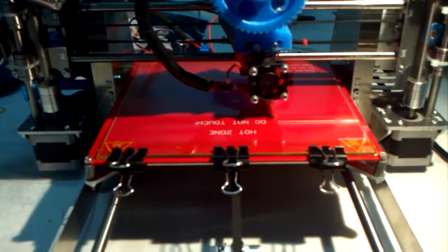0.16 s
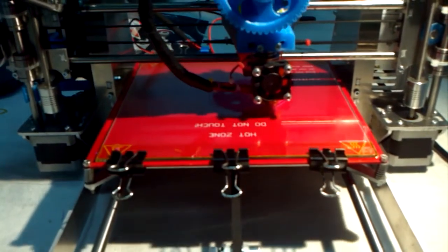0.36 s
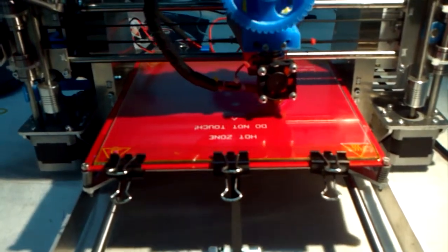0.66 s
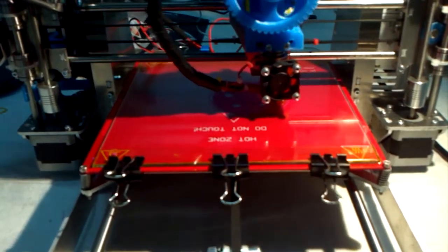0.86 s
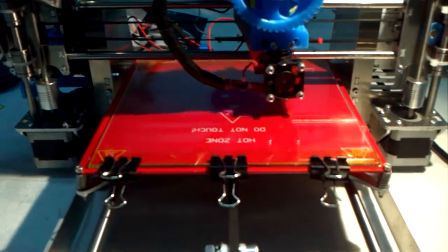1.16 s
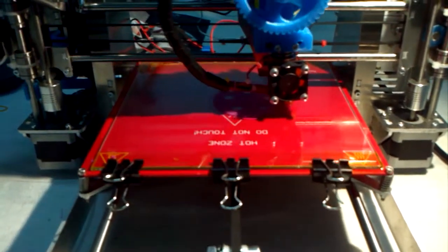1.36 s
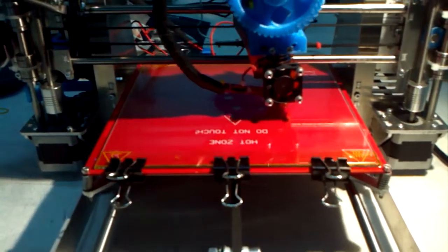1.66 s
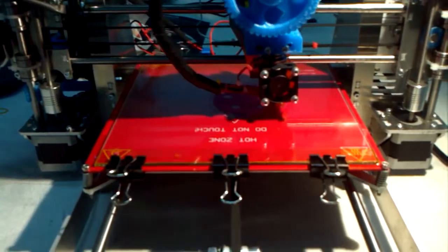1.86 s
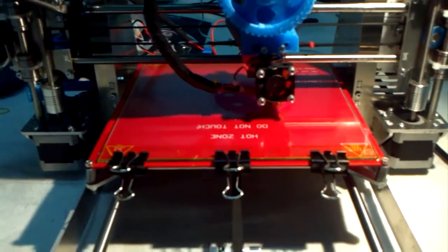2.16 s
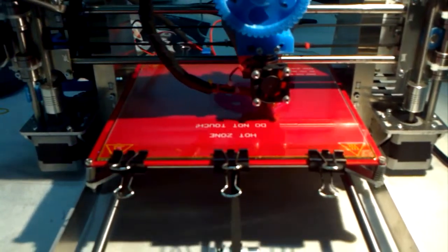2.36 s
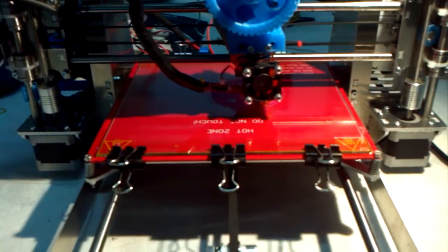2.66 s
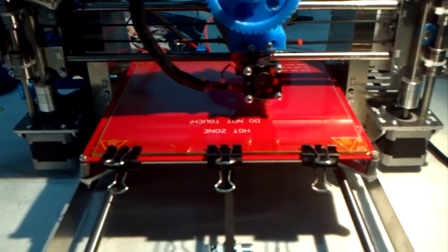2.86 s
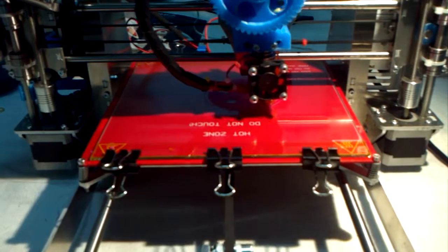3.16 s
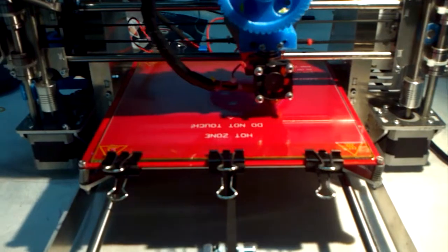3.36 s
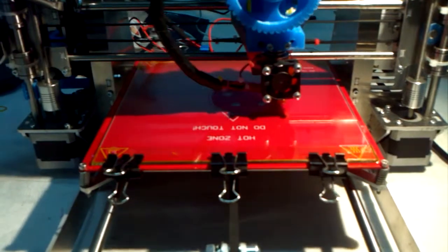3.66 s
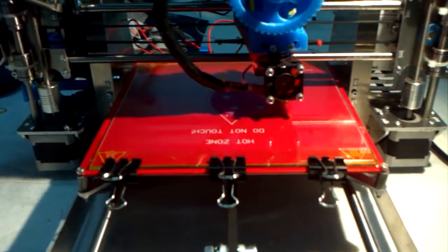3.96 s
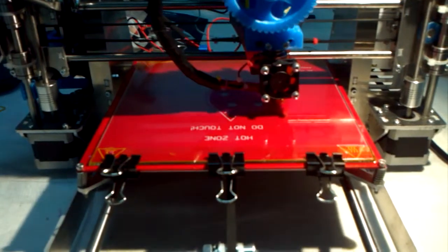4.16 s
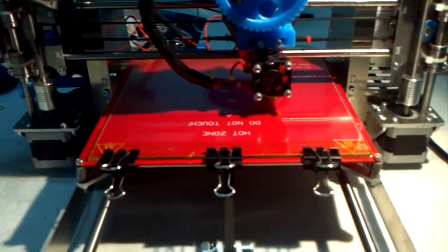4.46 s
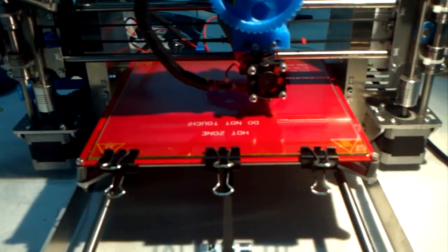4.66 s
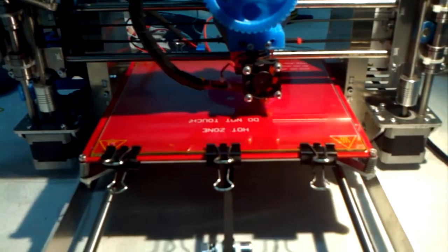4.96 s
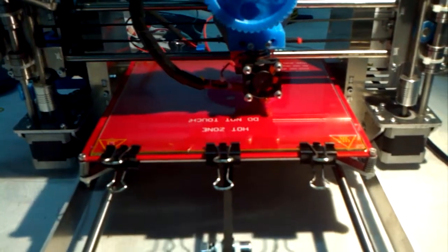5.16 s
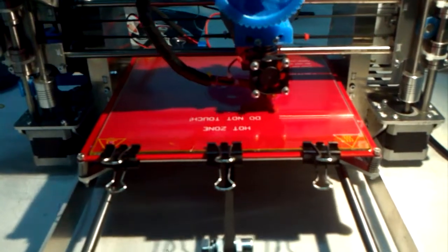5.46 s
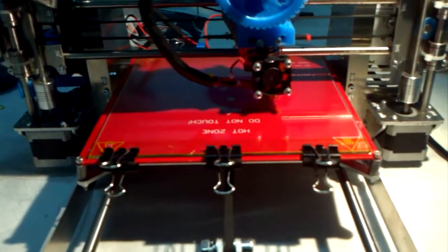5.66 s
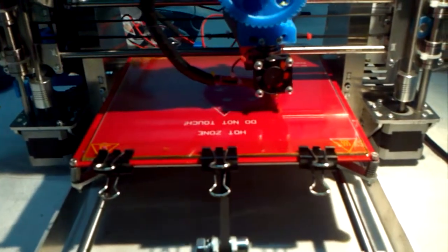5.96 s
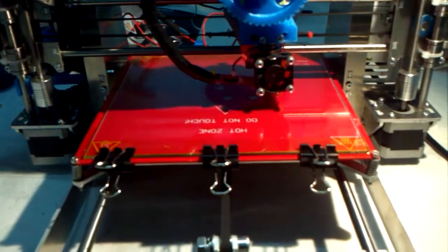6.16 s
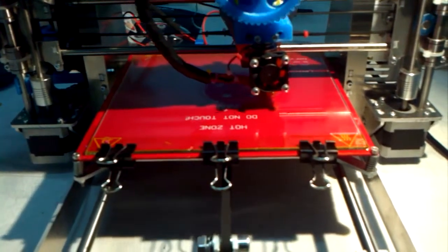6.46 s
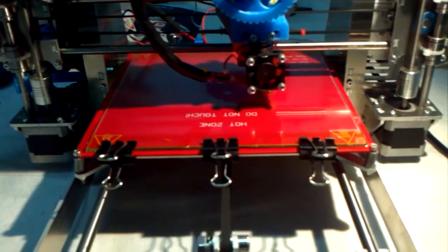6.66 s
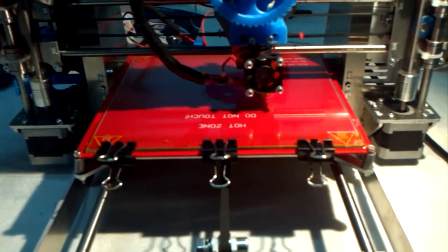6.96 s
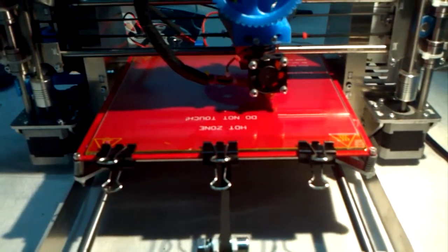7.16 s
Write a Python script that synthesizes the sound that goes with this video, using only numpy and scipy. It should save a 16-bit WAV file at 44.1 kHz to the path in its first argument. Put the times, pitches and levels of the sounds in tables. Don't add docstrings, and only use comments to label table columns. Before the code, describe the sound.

A small desktop printer runs close to the microphone in a small room. Fans hum and rush steadily while motors hold a thin, piercing tone with a low belt purr. Bright bearing ticks scatter irregularly on top. Every second or so the motors brake, the frame jolts with a low knock and loose rattle, and the tone resumes at practically the same pitch.

```python
import sys
import numpy as np
from scipy import signal
from scipy.fft import rfft, irfft, next_fast_len
from scipy.io import wavfile
from scipy.ndimage import uniform_filter1d, map_coordinates

SR = 44100
rng = np.random.default_rng(int(sys.argv[2]) if len(sys.argv) > 2 else 0)


def elevation(decibels):
    levels = np.asarray(decibels, float)
    return 10 ** (levels / 20)


def generate_wav(signal):
    frames = np.transpose(np.atleast_2d(signal))
    scaled = np.clip(frames, -1, 1) * 32767
    pcm = np.round(scaled).astype(np.int16)
    wavfile.write(sys.argv[1], SR, pcm)


N = 322810
T = np.arange(N) / SR
FEED_HZ = 70.69

# start in seconds, step rate, belt rate and roller rate in Hz.
SIDES = [
    (-0.01, 1176.7, 46.91, 45.57),
    (1.475, 1178.5, 47.1, 46.29),
    (2.86, 1177.4, 46.95, 45.69),
    (4.11, 1177.1, 46.99, 46.07),
    (5.25, 1177.3, 46.99, 46.21),
    (6.24, 1177.1, 46.96, 45.75),
    (7.075, 1177.3, 47.5, 45.2),
]


def unit(x):
    return x / np.sqrt(np.mean(x ** 2) + 1e-20)


def along(points, hz):
    f, v = np.transpose(points)
    return np.interp(np.log(hz + 1), np.log(f + 1), v)


def curves(rows):
    s, *cols = np.transpose(rows)
    return [np.interp(T, s, c) for c in cols]


def wobble(rate_hz):
    return map_coordinates(rng.standard_normal(2000), [T * rate_hz])


def filtered(x, response):
    size = next_fast_len(N + SR // 2)
    spectrum = rfft(x, size) * response(np.fft.rfftfreq(size, 1 / SR))
    return irfft(spectrum, size)[..., :N]


def modes(table):
    def response(f):
        return sum((-1) ** k * elevation(db) * 1j * f * width / (hz * hz - f * f + 1j * f * width)
                   for k, (hz, width, db) in enumerate(table))
    return response


def turns(hz):
    return 2 * np.pi * np.cumsum(hz * np.ones(N)) / SR


def tone(phase, db, flutter_db):
    level = np.sqrt(2) * elevation(db + flutter_db * wobble(12))
    return level * np.sin(phase + rng.uniform(0, 2 * np.pi))


def stack(phase, orders, flutter_db):
    return sum(tone(round(k) * phase, db, flutter_db) for k, db in orders)


def hum():
    # time in seconds, blade pass rate in Hz.
    blade_pass = [(0, 858.7), (1, 858.5), (1.7, 856), (4.1, 858.5), (5.7, 858.5), (6.75, 854.7),
                  (7.32, 854.2)]
    # shaft multiple, level in dB.
    fan_orders = [(1, -10.5), (4, -7), (7, -0.5), (14, -13.5)]
    # frequency in Hz, level in dB.
    small_fan = [(220.8, -72), (257.8, -72), (3883, -77)]
    # frequency in Hz, level in dB per Hz.
    air_spectrum = [(24, -70.5), (40, -21.5), (213, -0.5), (790, -9.5), (864, -6), (1080, -9), (1190, -8.5),
                    (1520, -12.5), (3930, -19), (4300, -16.5), (4810, -20.5), (6910, -17.5), (7390, -17),
                    (7910, -36.5), (8860, -54), (11500, -91), (19500, -120)]
    # frequency in Hz, width in Hz, level in dB.
    frame_modes = [(136, 12, -6.5), (252, 90, -0.5), (363, 22, -15)]
    # multiple of the feed rate, level in dB.
    feed_orders = [(1, -98), (2, -73), (3, -74), (4, -77.5), (5, -67)]

    blade_hz = curves(blade_pass)[0] + 0.5 * wobble(15)
    fan_db = -61 + 0.3 * wobble(4)
    fan = elevation(fan_db) * stack(turns(blade_hz) / 7, fan_orders, flutter_db=1)
    small = sum(tone(turns(hz), db, flutter_db=4) for hz, db in small_fan)
    feed = stack(turns(FEED_HZ), feed_orders, flutter_db=-2)

    air = unit(filtered(rng.standard_normal(N), lambda hz: elevation(along(air_spectrum, hz))))
    air *= elevation(0.4 * wobble(3))
    shake = unit(filtered(rng.standard_normal(N), lambda hz: modes(frame_modes)(hz) ** 2))
    return fan + small + feed + elevation(-57) * air + elevation(-65 + 1.5 * wobble(4)) * shake


def jolts():
    # time in seconds, peak in dB, frame ring in Hz, table ring in dB, scrape in dB.
    corners = [(0.001, -41.5, 262, -55, -50.5), (1.464, -39, 238, -57, -46.5), (1.5, -37, 254, -52, -64),
               (2.841, -40.5, 265.5, -64.5, -50.5), (2.856, -36.5, 262, -58, -59),
               (4.071, -48, 280, -58, -51), (4.091, -32.5, 246, -47, -45.5), (5.23, -34.5, 242, -55, -44),
               (5.247, -40, 256, -48.5, -51), (6.222, -36.5, 249, -71, -42.5),
               (7.041, -36.5, 241, -48.5, -46.5), (7.085, -41, 256, -69, -50.5)]
    scrape_spectrum = [(200, -30.5), (430, -8), (800, -7.5), (1300, -14), (1800, -12.5), (4000, -16.5),
                       (6800, -15)]

    ring, scrape, t = np.zeros(N + SR), np.zeros(N + SR), T[:SR // 5]
    shape = elevation(-60 * t / 0.12) * (1 - np.exp(-t / 0.0058))
    for s, db, frame_hz, table_db, scrape_db in corners:
        at = round(s * SR)
        rock = elevation(db - 1) * np.sin(2 * np.pi * frame_hz * t)
        rock += elevation(table_db + 8) * np.sin(2 * np.pi * 190 * t)
        ring[at:][:len(t)] += shape * rock
        scrape[at:][:len(t)] += elevation(scrape_db + 5) * shape
    grit = unit(filtered(rng.standard_normal(N), lambda hz: elevation(along(scrape_spectrum, hz))))
    return ring[:N] + scrape[:N] * grit


def strikes():
    # time in seconds, balls in dB, carriage in dB.
    ticks = [(0.1326, -45, -56), (0.2638, -40, -54), (0.3815, -47.5, -54.5), (0.4269, -46, -55),
             (0.5097, -42.5, -56), (0.5277, -42.5, -53), (0.5716, -42.5, -53), (0.6893, -44.5, -53.5),
             (0.8355, -44, -56), (0.9672, -43.5, -54), (1.1024, -44, -59), (1.2326, -47, -55),
             (1.26, -45, -56), (1.275, -47, -52), (1.4057, -42.5, -51), (1.6771, -40.5, -54),
             (1.7664, -46, -53), (1.8741, -44, -58), (1.9165, -39, -51.5), (2.0428, -40.5, -54),
             (2.0857, -42.5, -54), (2.1106, -42.5, -55), (2.3236, -42.5, -52.5), (2.396, -40, -53),
             (2.4638, -42.5, -56), (2.4957, -42, -59), (2.608, -41, -52), (2.6259, -42, -58),
             (2.6723, -42, -55), (2.6898, -42, -54),
             (3.6193, -39.5, -53.5), (3.7245, -43, -55), (3.79, -42, -57.5), (4.0153, -47, -52),
                   (4.1974, -43, -59), (4.264, -42.5, -53), (4.363, -41, -55), (4.4613, -45, -61),
                   (4.4877, -42, -52), (4.5325, -41, -52), (4.5756, -38.5, -50.5), (4.7631, -42, -54),
                   (5.177, -38, -54), (5.3571, -44.5, -51), (5.6506, -43, -55), (5.681, -47, -55),
                   (6.0498, -38, -50), (6.092, -39.5, -62), (6.1375, -40.5, -54), (6.33, -38.5, -55.5),
                   (6.37, -39, -53), (6.4188, -40.5, -59), (6.4597, -40.5, -58), (6.568, -38.5, -51.5),
                   (6.655, -42.5, -63), (6.8262, -41.5, -53), (6.8537, -39.5, -54.5), (7.1407, -42, -55),
                   (7.1995, -42, -51), (7.265, -36, -52),
             (0.071, -47, -55), (0.1538, -45.5, -55), (0.2253, -48, -61), (0.4428, -41, -51),
                  (0.4615, -48.5, -53), (0.7794, -48, -56), (1.299, -43, -57), (1.8302, -43.5, -56),
                  (1.8553, -44, -59), (1.8887, -42.5, -55), (2.0708, -44.5, -53), (2.1282, -46, -57),
                  (2.302, -44, -60), (2.3414, -42.5, -61), (2.6507, -43, -53), (3.1547, -44.5, -57),
                  (3.9631, -47.5, -58), (3.9863, -43, -61), (4.1593, -41.5, -56), (4.2773, -42, -56),
                  (4.4047, -46.5, -57), (4.4734, -43, -54), (4.7443, -44.5, -63), (5.1293, -45, -55),
                  (5.5536, -45.5, -55), (5.7327, -46.5, -56), (5.8563, -42.5, -59), (5.9279, -43, -54),
                  (6.6117, -43.5, -52), (6.686, -42, -53)]
    # balls in dB, carriage in dB.
    tick_gain_db = (-4, 4.5)
    # time in seconds, balls in dB, carriage in dB.
    rattles = [(.0002, -48, -44.5), (.0086, -44, -44), (1.467, -62, -60), (1.475, -40.5, -60),
               (1.482, -50.5, -50), (2.816, -44.5, -58), (2.822, -49, -46), (2.843, -38.5, -43),
               (2.849, -44, -42.5), (2.859, -42, -47), (2.866, -48.5, -50), (2.891, -44.5, -46),
               (4.075, -43, -55), (4.08, -55, -47.5), (4.089, -50, -56), (4.112, -40, -50),
               (5.219, -46, -46), (5.235, -50.5, -51), (5.242, -37, -45.5), (5.2455, -34.5, -40.5),
               (5.254, -44.5, -45), (6.233, -46.5, -58), (6.263, -44.5, -48), (7.038, -47, -55),
               (7.049, -41, -52), (7.0615, -35, -39.5), (7.068, -43, -45), (7.067, -41.5, -45),
               (7.077, -33.5, -41), (7.084, -46, -48)]
    # time in seconds, typical nudge in dB.
    nudge_level = [(0, -62), (.8, -62.5), (1.2, -65), (1.8, -57), (2.7, -59), (3.2, -67.5), (3.9, -57.5),
                   (4.5, -59), (4.85, -63), (5.3, -55), (6.0, -57.5), (6.8, -60), (7.32, -57)]
    nudge_phase = [.93, .4, .76, .38, .38, .45, .4]

    clear = np.array(ticks) + [0, *tick_gain_db]

    luck = np.clip(rng.standard_normal((int(N / SR * FEED_HZ) - 1, 3)), -3, 1.6)
    s = np.arange(len(luck)) / FEED_HZ
    side = np.clip(np.searchsorted(np.array(SIDES)[:, 0], s) - 1, 0, None)
    s = s + np.array(nudge_phase)[side] / FEED_HZ + 0.0015 * luck[:, 0]
    balls_db = np.interp(s, *np.transpose(nudge_level)) + 6 * luck[:, 1]
    carriage_db = balls_db - 4.5 + 3 * luck[:, 2]
    return np.vstack([clear, rattles, np.transpose([s, balls_db, carriage_db])])


def bearings():
    # frequency in Hz, width in Hz, level in dB.
    ball_modes = [(4770, 170, 2.5), (5174, 440, -4), (5646, 190, -1), (6800, 1100, -10)]
    # frequency in Hz, width in Hz, level in dB.
    carriage_modes = [(1750, 220, -3.5), (2440, 300, -2.5), (3260, 320, 1), (3650, 350, -3.5),
                      (4020, 220, 0)]

    blows, t, hits = np.zeros((2, N + SR)), T[:SR // 60], strikes()
    bursts = rng.standard_normal((len(hits), len(t))) * elevation(-60 * t / 0.021) * (1 - np.exp(-t / 0.002))
    bursts[:, round(0.0008 * SR)] = 4
    for (s, *db), burst in zip(hits, bursts):
        level = elevation(np.array(db)[:, None])
        blows[:, round(s * SR):][:, :len(t)] += level * burst / np.linalg.norm(burst)
    blows = blows[:, round(0.001 * SR):][:, :N]

    chatter = unit(elevation(3 * wobble(150)) * rng.standard_normal(N))
    chatter *= elevation(0.12 * (step_level() + 47.5))
    balls, carriage = blows * elevation([[30], [32]]) + elevation([[-57], [-54]]) * chatter

    def ball_response(hz):
        return modes(ball_modes)(hz) / (1 + (4600 / (hz + 1)) ** 20)

    def carriage_response(hz):
        return modes(carriage_modes)(hz) ** 2

    return filtered(balls, ball_response) + filtered(carriage, carriage_response)


def step_level():
    # start in dB, slip time in seconds, dB before slip, dB after slip, end in dB.
    whine_path = [
        (-53, .74, -57.5, -64, -71),
        (-55, 2.34, -51.5, -51.5, -50.5),
        (-53.5, 3.465, -55.5, -55.5, -70),
        (-57, 4.72, -51, -52, -51.5),
        (-53, 5.78, -54.5, -56, -62.5),
        (-55.5, 7, -48.5, -52, -52),
        (-53.5, 7.8, -51, -52, -54),
    ]
    ends = [s for s, *_ in SIDES[1:]] + [N / SR + 1]
    rows = []
    for (start, *_), end, (first, slip, before, after, last) in zip(SIDES, ends, whine_path):
        settled = min(slip + 0.33, end - 0.03)
        rows += [(start, first), (slip, before), (slip + 0.015, after), (settled, last), (end - 0.02, last)]
    return curves(rows)[0]


def axes():
    # belt in dB, belt 7th order in dB, roller in dB.
    loads = [(-94, -87, -64), (-62.5, -65, -71.5), (-90, -78, -64), (-61, -68.5, -74.5), (-91.5, -75, -69),
             (-94, -84, -63), (-63.5, -97, -65.5)]
    # multiple of the step rate, level in dB.
    step_orders = [(2, -73), (3, -75), (4, -68), (5, -79)]
    # step order, feed order, level in dB.
    supply_beats = [(1, -3, -71), (1, -2, -75), (1, 1, -74), (2, 1, -82), (3, 1, -78), (4, -2, -80),
                    (4, -1, -80), (4, 1, -82), (5, 1, -83)]
    # multiple of the belt rate, level in dB.
    belt_orders = [(2, -22.5), (3, -4.5), (4, 1), (5, -14.5), (6, -9), (8, -9)]
    # multiple of the roller rate, level in dB.
    roller_orders = [(2, -13), (3, -11.5), (4, -21.5), (5, 0.5), (6, 2), (7, -18.5), (8, -2), (10, -15)]

    sides = np.array(SIDES)
    now = np.clip(np.searchsorted(sides[:, 0], T) - 1, 0, None)
    step_hz, belt_hz, roller_hz = sides[now, 1:].T
    belt_db, seventh_db, roller_db = np.array(loads)[now].T

    to_corner_s = np.append(sides[1:, 0], T[-1] + 1)[now] - T
    braking = np.clip(to_corner_s / 0.052, 0, 1) ** 2
    starting = np.clip((T - sides[now, 0]) / 0.008, 0, 1)
    speed = 0.1 + 0.9 * uniform_filter1d(braking * starting, size=200)

    step, belt, feed = turns(step_hz), turns(belt_hz), turns(FEED_HZ)
    tone_db = step_level()
    whine = tone(step, tone_db, flutter_db=0.5)
    whine += elevation(0.15 * (tone_db + 42)) * stack(step, step_orders, flutter_db=2)
    beats = sum(tone(round(k) * step + round(m) * feed, db, flutter_db=1.5) for k, m, db in supply_beats)

    purr = elevation(belt_db) * stack(belt, belt_orders, flutter_db=2)
    purr += tone(7 * belt, seventh_db + 2, flutter_db=1)
    roller = turns(roller_hz + 0.1014 * wobble(3))
    purr += elevation(roller_db) * stack(roller, roller_orders, flutter_db=-3)
    purr += elevation(belt_db) * stack(roller, [(4, -7.5)], flutter_db=2)
    return speed * (whine + beats + purr)


def room(x):
    # frequency in Hz, t60 in seconds.
    decay = [(200, 0.2), (2000, 0.15), (8000, 0.18)]
    hz, t, z = signal.stft(rng.standard_normal(SR // 2), SR, nperseg=256)
    z = z * elevation(-60 * t / along(decay, hz)[:, None])
    tail = signal.istft(z, SR, nperseg=256)[1]
    return signal.fftconvolve(np.pad(x, (300, 0)), tail / np.linalg.norm(tail))[:N]


def scene():
    knocks = bearings() + jolts()
    return (hum() + axes() + knocks + elevation(-9) * room(knocks))[None]


def starved(sound):
    # low edge in Hz, high edge in Hz, step tone in dB above which the band goes, sway in dB.
    weak_bands = [(7560, 8440, -54.5, 2), (1060, 1140, -48.5, 4)]
    for low, high, over_db, sway_db in weak_bands:
        band = filtered(sound, lambda hz: (hz > low) & (hz < high))
        off = step_level() + sway_db * wobble(9) > over_db
        sound = sound - band * uniform_filter1d(1.0 * off, size=600)
    return sound


def roll_off(x):
    return signal.sosfilt(signal.butter(12, 9010, fs=SR, output="sos"), x)


def record(dry):
    # frequency in Hz, gain in dB.
    mic_response = [(30, -37), (70, -4.5), (110, -3), (6500, 3.5), (7400, -3.5), (7800, -6.5),
                    (8000, -13.5), (8200, -51)]
    mirror_response = [(7900, -48), (8000, 3.5), (8400, -3.5), (9000, -31), (9400, -81)]  # (Hz, dB)
    sound = filtered(dry, lambda hz: elevation(along(mic_response, hz)))
    mirror = sound * np.cos(2 * np.pi * 16000 * T)
    mirror = filtered(mirror, lambda hz: elevation(along(mirror_response, hz)))
    return roll_off(starved(sound + mirror))


dry = scene()
out = record(dry)
generate_wav(out)
```